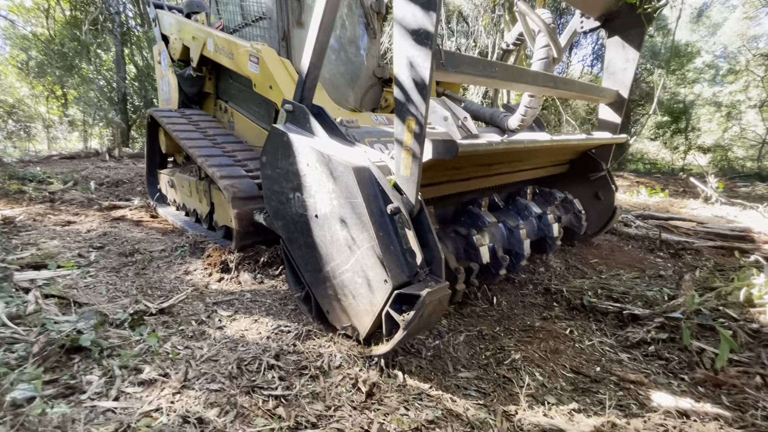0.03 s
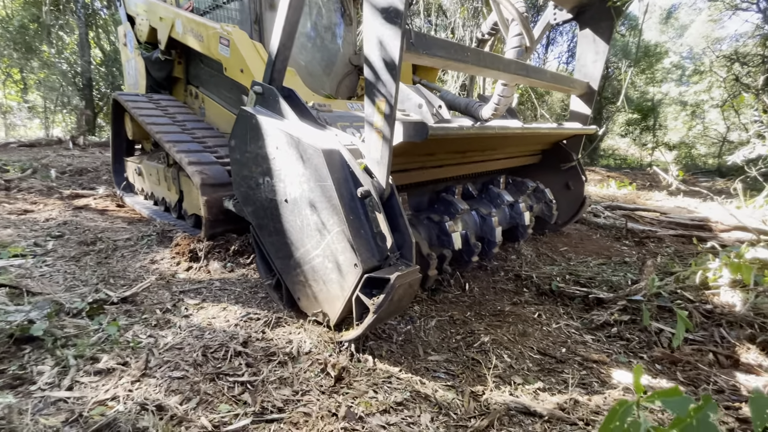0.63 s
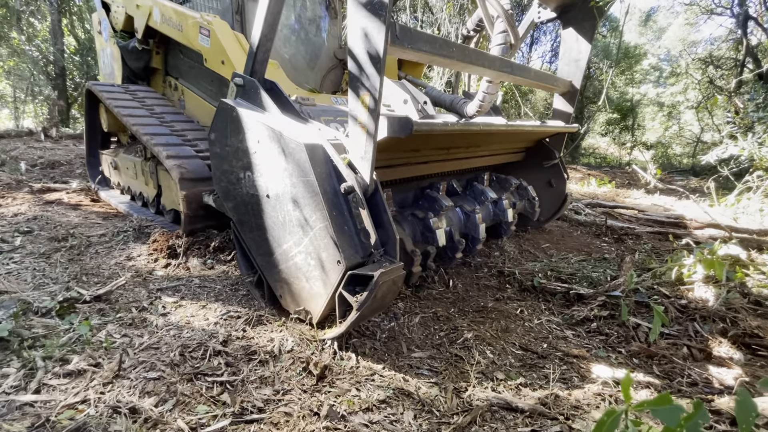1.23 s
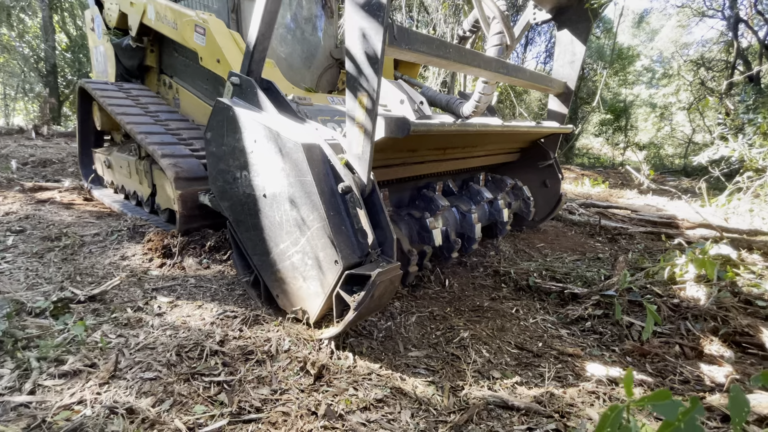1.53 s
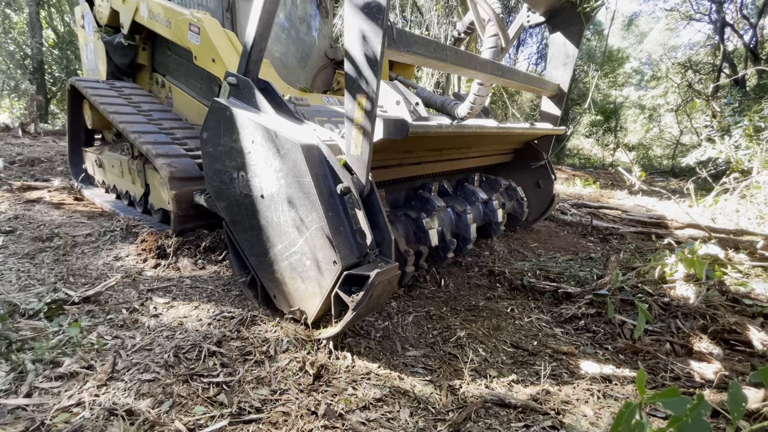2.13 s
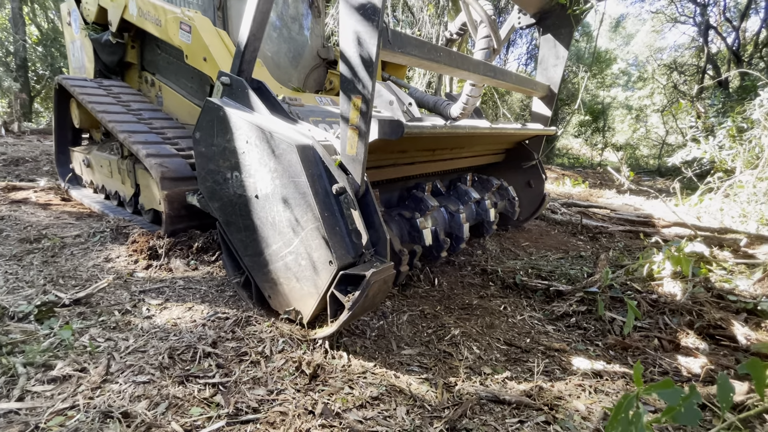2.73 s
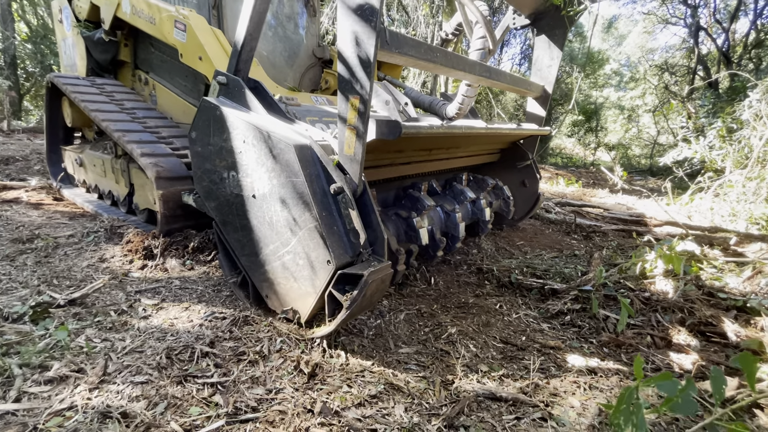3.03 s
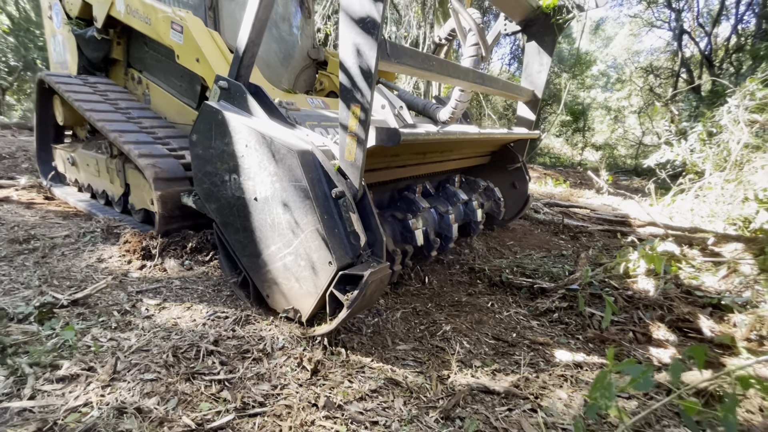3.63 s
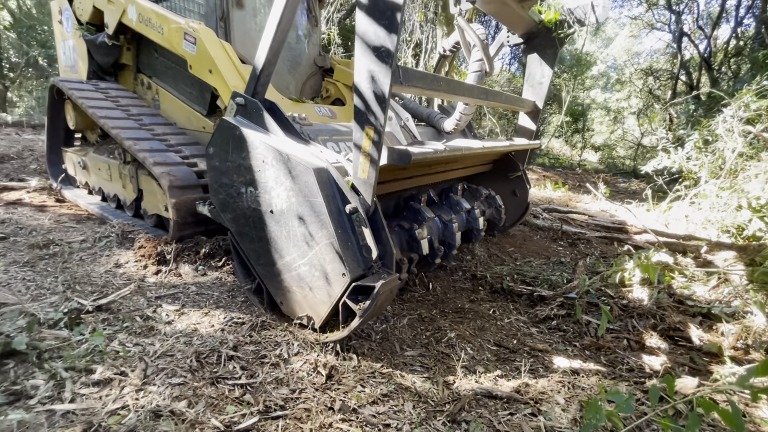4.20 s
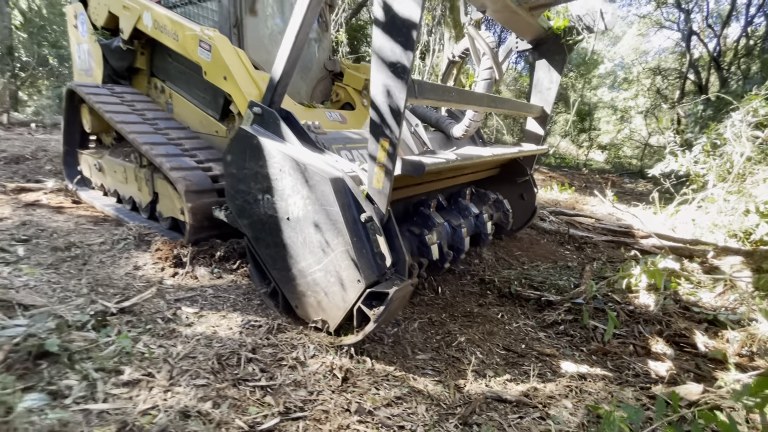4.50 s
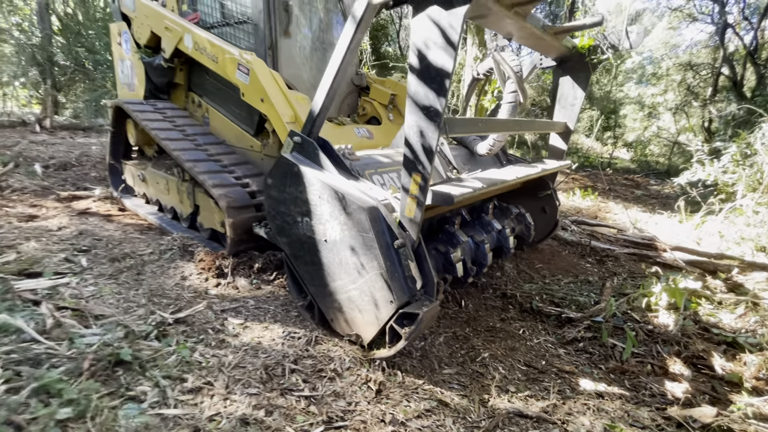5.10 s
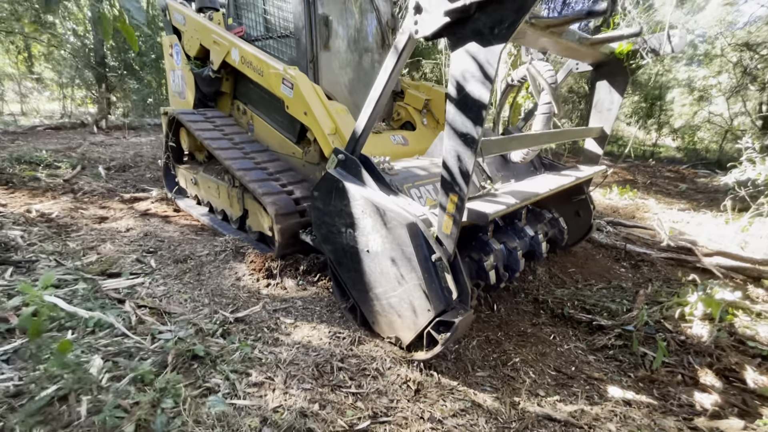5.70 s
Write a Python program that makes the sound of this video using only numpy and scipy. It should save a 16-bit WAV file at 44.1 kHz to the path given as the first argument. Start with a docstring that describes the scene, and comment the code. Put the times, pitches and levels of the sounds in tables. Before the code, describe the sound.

A diesel loader stands at high idle, droning, knocking and whining, with light twig snaps and dry leaf rustle underfoot.

```python
"""In a wood, a few metres from a hand-held phone, a tracked loader with a mulching head stands at high
idle: its four-cylinder diesel drones and knocks and its hydraulics whine throughout. In the first
half second an engine further off throttles back, leaving a low hum. Dry leaves rustle underfoot,
then twigs crack and air puffs on the microphone. Past three seconds loose panels rattle, and
towards the end the listener steps aside through the lobes and shadows of the machine's sound."""
import sys
import numpy as np
from scipy import signal
from scipy.fft import rfft, irfft
from scipy.io import wavfile
from scipy.ndimage import uniform_filter1d, map_coordinates

SR = 44100
rng = np.random.default_rng(int(sys.argv[2]) if len(sys.argv) > 2 else 0)


def dump(signal):
    """Clip the signal to [-1, 1] and save it as 16-bit WAV at the path in sys.argv[1]."""
    limited = np.clip(np.atleast_2d(signal).T, -1, 1)
    pcm = np.round(limited * 32767).astype(np.int16)
    wavfile.write(sys.argv[1], SR, pcm)


N = 262395
TIME = np.arange(N) / SR
FREQ = np.maximum(np.arange(N // 2 + 1) * SR / N, 1)

# the loader's four-stroke cycle rate: t/s, f/Hz
CYCLE_RATE = [(0, 18.86), (.17, 18.76), (.3, 18.85), (.6, 18.92), (5.95, 18.92)]
# exhaust, fan and block tones: multiple of the cycle rate, level/dB
DRONE_TONES = [(4, -30), (6, -41.5), (7, -40.5), (8, -50), (9, -63), (10, -54.5), (11, -54), (12, -49),
               (13, -58), (14, -49.5), (15, -61), (16, -51), (17, -67), (18, -60), (19, -56), (20, -42.5),
               (21, -52), (22, -60), (23, -63), (24, -43), (25, -61), (26, -56), (27, -51.5), (28, -49),
               (29, -49.5), (30, -53), (31, -60), (32, -49), (33, -60), (34, -53), (35, -48), (36, -44.5),
               (37, -55), (38, -51), (39, -59), (40, -55.5), (42, -57), (43, -57)]
# pump and gear tones: multiple of the cycle rate, relative level/dB
WHINE_TONES = [(46, -63), (47, -61), (48, -52.5), (50, -62), (51, -63), (52, -58), (54, -53), (60, -65),
               (64, -62), (68, -63), (70, -65), (72, -56.5), (74, -61), (76, -61), (77, -64), (84, -61),
               (96, -61.5), (104, -61), (108, -62), (120, -69), (125, -60.5), (133, -66), (134, -64),
               (139, -67), (142, -66), (144, -57.5), (153, -67), (155, -68), (156, -68), (162, -69),
               (168, -73), (176, -68), (192, -73), (212, -75), (288, -72), (312, -75), (336, -73)]
# the phone's two microphone ports: f/Hz, lead of left over right/rad, likeness 0-1
MIC_PORTS = [(70, .8, .85), (150, 1.5, .7), (230, 0, .85), (400, -.15, .85), (520, .25, .8), (700, 1, .65),
             (830, 1.6, .45), (905, 2.5, .6), (965, 1.6, .7), (1020, 1.45, .8), (1300, 3, .65),
             (1450, 2.8, .65), (1750, 1.7, .65), (2300, 3.7, .75), (2900, 4, .65), (3400, 6.7, .5),
             (4200, 6.5, .5), (4700, 9, .4), (5700, 12, .4), (6800, 13, .4), (9000, 16.5, .4),
             (10500, 21.3, .85), (12000, 18.9, .9)]


def loader():
    """A few metres off: the diesel and its pumps, all geared to one governed shaft."""
    cycle = np.cumsum(curve(CYCLE_RATE) * (1 + 0.000495 * walk(15))) / SR
    cycle = cycle + .0004 * walk(45)  # the shaft twists a little, which blurs the highest whines
    drone = tones(cycle, DRONE_TONES, flutter_db=.8, sway_db=.6)
    whine = undb(1.5) * tones(cycle, WHINE_TONES, flutter_db=1.1, sway_db=.9)
    machine = drone + whine + clatter(cycle) + diesel_knock(cycle) + roar(cycle)
    return at_ports(step_aside(machine) + rattles(cycle))


def tones(cycle, partials, flutter_db, sway_db):
    """Tones locked to the crankshaft; some low ones join in a thump, higher ones come by any path."""
    # the side each tone is heard on: f/Hz, left minus right/dB
    sides = [(76, 4), (130, 18), (220, 18.5), (390, 7), (470, 16.5), (700, 8.5), (900, 6.5), (1020, 16.5),
             (1300, 9), (1550, 30), (1900, -7.5), (3000, -8.5), (6400, 7)]
    # standing waves around the machine: multiple of the cycle rate, crossing t/s, half-length/s, gain/dB
    standing_waves = [(12, 5.8, .6, -5), (24, 5.7, .7, 3), (27, 5.4, 1.2, 4), (28, 5.8, .8, -10),
                      (29, 5.5, 1.2, 3), (32, 5.8, .6, 3), (36, 5.8, .6, -5), (54, 5.6, 1.5, 4.5),
                      (64, 5, 1, -14), (68, 4.6, .9, 6), (84, 4.8, .7, -12), (108, 3.7, .6, -8),
                      (108, 5.3, .6, 3), (120, 4.6, 1, 9), (125, 4.6, 1.5, -10), (144, 5.2, .6, -7),
                      (168, 4.3, .8, 6)]
    thump_multiples, thump_place = range(10, 19), .62  # the block thumps here and half a cycle later
    out = np.zeros((2, N))
    for multiple, db in partials:
        pan_db = np.interp(multiple * CYCLE_RATE[-1][1], *np.transpose(sides))
        lobe_db = sum(peak * swell(s, half_s) for k, s, half_s, peak in standing_waves if k == multiple)
        gain = undb(db + lobe_db + flutter_db * walk(21.75) + sway_db * walk(2.624))
        phase = rng.random() * (multiple > 4)
        if multiple in thump_multiples:
            # odd multiples lie a quarter turn off, so both thumps of a cycle are equally strong
            phase = -multiple * thump_place + multiple % 2 / 4
        out += pan(pan_db) * gain * np.sqrt(2) * np.cos(2 * np.pi * (multiple * cycle + phase))
    return out


def roar(cycle):
    """Combustion noise throbs with the four firings of a cycle under a smooth hiss of fan air."""
    # fan air and combustion spectrum: f/Hz, left level/dB, right level/dB
    colour = [(20, -95, -95), (47, -65, -64), (66, -64, -60), (100, -70, -67), (165, -70.5, -80),
              (290, -74.5, -84), (420, -72, -79), (520, -68.5, -78), (620, -70.5, -79), (780, -77.5, -81),
              (1000, -78, -85), (1200, -81, -86), (1560, -78.5, -81), (1950, -85, -82),
              (2650, -83.5, -80.5), (3300, -87, -84), (4400, -86.5, -85), (5400, -85.5, -88),
              (7000, -88, -97), (8500, -87, -95.5), (10000, -97, -99), (11500, -97, -97.5)]
    decay_firings, throb_top_hz = .85, 1500
    air = rng.standard_normal((2, N)) * undb(.5 * walk(13))
    pulsing = unit(1 + np.exp(-(4 * cycle % 1) / decay_firings))
    throb = shape(air * (pulsing - 1), 1 / (1 + (FREQ / throb_top_hz) ** 2))
    return undb(-0.43) * radiate(air + throb, colour)


def clatter(cycle):
    """Injectors and valves strike alike on every cycle: a comb of weak lines between the main tones."""
    # injector and valve spectrum: f/Hz, left level/dB, right level/dB
    colour = [(168, -75, -99), (477, -59, -78), (655, -75, -93), (855, -74.5, -80.5), (1310, -73.5, -73),
              (1600, -78.5, -82.5), (2130, -75, -74), (2930, -80, -81.5), (3250, -104.5, -90),
              (4700, -87, -82.5), (6850, -104, -106)]
    size, injection_place = 2304, .07  # samples a cycle; injectors strike here and half a cycle later
    since_strike = 2 * (np.arange(size) / size - injection_place) % 1
    strikes = rng.standard_normal((2, size)) * np.exp(-since_strike / 1.2)
    lines = np.exp(1j * np.angle(rfft(strikes)))
    main_multiples = [int(multiple) for multiple, _ in [*DRONE_TONES, *WHINE_TONES]]
    lines[:, [0] + main_multiples] = 0
    patterns = unit(irfft(lines * undb(2 * rng.standard_normal(size // 2 + 1))))
    repeats = [map_coordinates(p, [cycle % 1 * size], order=3, mode="grid-wrap") for p in patterns]
    return undb(-3.0) * radiate(repeats, colour)


def diesel_knock(cycle):
    """Two cylinders fire harder than the rest: each rings the block and ticks once a cycle."""
    # the hard-firing cylinders: place in the cycle 0-1, relative level/dB
    cylinders = [(.25, -5), (.73, 0)]
    ring_hz, decay_s = 1630, .004
    blow, ring = 0, 0
    for place, db in cylinders:
        age = ((cycle - place) % 1) / CYCLE_RATE[-1][1]
        stroke = undb(db) * np.exp(-age / decay_s)
        blow += stroke
        ring += stroke * np.sin(2 * np.pi * ring_hz * age)
    rasp = unit(resonance(blow * rng.standard_normal(N), ring_hz, width_hz=750))
    block = unit(unit(ring) + .8 * rasp)
    tick = unit(resonance(blow * rng.standard_normal((2, N)), hz=5300, width_hz=3800))
    return pan(1.6) * (undb(-51.5) * block + undb(-73.5) * tick)


def rattles(cycle):
    """Each cycle shakes the loose panels into a short metallic rasp, each heard from its own spot."""
    # panel resonances: f/Hz, width/Hz, loudest t/s, half-length/s, level/dB
    panels = [(2687, 150, 3.67, .75, -50), (2930, 140, 4.25, 0.43, -51.5), (2860, 190, 4.8, .3, -52)]
    shake_place, decay_cycles = .55, .6
    shake = np.exp(-((cycle - shake_place) % 1) / decay_cycles) * rng.standard_normal(N)
    return pan(-5.0) * sum(undb(db) * swell(s, half_s) * unit(resonance(shake, hz, width_hz))
                           for hz, width_hz, s, half_s, db in panels)


def step_aside(x):
    """Each lobe or shadow lifts or lowers its band while the microphone is carried through it."""
    # lobes (+) and shadows (-) of the panels: f/Hz, half-width/Hz, crossing t/s, half-length/s, gain/dB
    lobes = [(76, 67, 6.4, 1.7, -4), (168, 55, 8.2, 0.84, 6), (250, 60, 5, 1.1, -3.5),
             (390, 200, 5.9, 2.6, 2.5), (692, 110, 4.86, 1.07, -3.5), (910, 17, 6, 0.43, -11),
             (876, 75, 4.57, 1.6, 4.5), (996, 60, 4.2, 1.3, 5), (1250, 94, 4.93, 0.88, 6),
             (1700, 360, 5.7, 0.46, -1), (1500, 950, 6.15, 1.4, 3), (2110, 130, 6.06, 0.52, 5.5),
             (2320, 120, 4.4, 0.2, 3), (2880, 54, 4.2, .7, -9), (3160, 100, 4.16, .55, 3)]
    for hz, width_hz, s, half_s, db in lobes:
        band = shape(x, np.exp(-((FREQ - hz) / width_hz) ** 2))
        x = x + band * (undb(db * swell(s, half_s)) - 1)
    return x


def radiate(pair, colour):
    """Colour two unrelated white signals into sound that is partly alike at the two microphone ports."""
    alike = np.clip(spectra(MIC_PORTS)[1], 0, 1)
    right = shape(pair[0], alike) + shape(pair[1], np.sqrt(1 - alike ** 2))
    return shape(np.array([pair[0], right]), undb(spectra(colour)) * np.sqrt(SR / 2))


def at_ports(x):
    """Sound from the machine reaches the right microphone port later than the left."""
    lead = spectra(MIC_PORTS)[0]
    return np.array([x[0], shape(x[1], np.exp(-1j * lead))])


def far_engine():
    """Further off, uneven exhaust pulses slow and fade; the boom comes straight, the rasp off trunks."""
    # muffler response: f/Hz, left gain/dB, right gain/dB
    muffler = [(40.6, -30, -64), (77.7, -6, 17.5), (114, -11, 2), (147.3, 11, 0), (194, -17, -30),
               (298, 2, -7), (377, -6.5, -13), (453, -2.5, -8), (525, -7, -15), (593, 1, -5),
               (670, -6, -13), (830, -33, -14.5), (1360, -14.5, -24.5), (2080, -33, -25.5),
               (3860, -34, -37), (8850, -41, -57)]
    load_hz, idle_hz, release_s, sink_s = 74.5, 30, .33, .6  # firings sink once the throttle is let go
    fade_from_s, fade_db_per_s = .44, 18
    boom_ends_s, boom_fall_s = .4, .01
    scatter_hz, echo_decay_s = 450, .04
    coasting = np.maximum(TIME - release_s, 0)
    firing_hz = idle_hz + (load_hz - idle_hz) * np.exp(-coasting / sink_s)
    firings = np.cumsum(firing_hz * (1 + .005 * walk(60))) / SR
    pulses = np.diff(np.floor(firings), prepend=0) * undb(0.62 * walk(120))
    gas = unit(np.exp(-(firings % 1) / .5) * rng.standard_normal(N))
    level = undb(-34.5 - fade_db_per_s * np.maximum(TIME - fade_from_s, 0))
    exhaust = level * unit(shape(unit(pulses - pulses.mean()) + 1.2 * gas, undb(spectra(muffler))))
    trunks = rng.standard_normal((2, SR // 2)) * np.exp(-TIME[:SR // 2] / echo_decay_s)
    echo = signal.fftconvolve(exhaust, trunks / np.sqrt(np.sum(trunks[0] ** 2)), axes=1)[:, :N]
    on_load = .5 - .5 * np.tanh((TIME - boom_ends_s) / boom_fall_s / 2)
    return exhaust * on_load + undb(6.5) * shape(echo, FREQ ** 2 / (FREQ ** 2 + scatter_hz ** 2))


def hums():
    """Off to the left, wavering hums beat against the drone, probably the second engine idling."""
    # tones not geared to the loader: f/Hz, level/dB
    free_tones = [(64.3, -54), (90, -56), (96.3, -55), (116.2, -49), (128.9, -48.5), (193, -61), (208, -61),
                  (257.3, -57), (525, -53)]
    hum = 0
    for hz, db in free_tones:
        level = undb(db + 2 * walk(3))
        turns = np.cumsum(hz * (1 + .004 * walk(4))) / SR
        hum += level * np.cos(2 * np.pi * turns)
    return pan(10) * np.sqrt(2) * hum


def twigs():
    """Underfoot, fibres tear in a burst: each twig rings briefly in two bands under bright splinters."""
    # breaking twigs: t/s, level/dB, ring f/Hz, decay/s, crack f/Hz, crack over ring/dB
    breaks = [(.933, -35, 4700, .003, 7500, -7), (.993, -29.5, 4760, 0.0049, 7200, -9),
              (1.487, -36.5, 8000, 0.0035, 5500, -1), (1.625, -26.5, 8000, 0.0021, 6900, -14),
              (1.7242, -25, 7600, 0.0017, 4450, 1), (1.901, -35, 8200, 0.002, 5500, -1),
              (2.023, -36, 7850, .004, 4970, -1), (2.698, -36.5, 8100, .0025, 5500, -5),
              (3.413, -38.5, 7460, 0.0087, 4960, 2), (3.429, -41, 5450, .005, 3800, 1),
              (3.44, -28.5, 8250, 0.0023, 5040, -8), (3.566, -38, 6460, .004, 8450, -4),
              (3.608, -38, 8540, .005, 5500, 0)]
    size, attack_s = 4096, .00034
    age = TIME[:size]
    out = np.zeros((2, N))
    for s, db, hz, decay_s, crack_hz, crack_db in breaks:
        burst = rng.standard_normal((2, size)) * np.exp(-age / decay_s) * (1 - np.exp(-age / attack_s))
        ring = pan(6) * snap(burst, hz, width_hz=2400)
        crack = undb(crack_db) * snap(burst, crack_hz, width_hz=1100)
        splinter = undb(-6) * snap(burst, hz=11500, width_hz=5900)
        start = int(s * SR)
        out[:, start:start + size] += undb(db) * (ring + crack + splinter)[:, :N - start]
    return out


def snap(burst, hz, width_hz):
    """A short burst rung through one steep resonance, peak 1."""
    twig = signal.iirpeak(min(hz, SR / 3), hz / width_hz, fs=SR)
    ring = signal.lfilter(*twig, signal.lfilter(*twig, burst))
    return ring / np.abs(ring).max()


def leaves():
    """Below the microphone, tiny crackles swell under each step, each patch of litter its own colour."""
    # dry leaf spectrum: f/Hz, relative level/dB
    colour = [(1500, -25), (3500, 10), (6000, 6), (9000, 9), (12000, -27)]
    # feet shifting in the litter: t/s, level/dB, half-length/s, centre f/Hz, left minus right/dB
    footsteps = [(.08, -56.5, 0.29, 3800, -5), (.45, -56.5, 0.13, 6000, 10), (0.447, -57, 0.16, 11600, -2),
                 (.8, -65, 0.19, 5650, 0), (3.436, -65, .03, 7600, 7), (3.432, -54, .03, 4260, 0),
                 (4.95, -63, 0.15, 3700, -3), (5.3, -60.5, 0.93, 5900, 3), (5.553, -59, 0.073, 3600, -7),
                 (5.88, -59, 0.11, 4400, -1)]
    crackles_per_s = 2500
    onsets = rng.random((2, N)) < crackles_per_s / SR
    grains = onsets * rng.standard_normal((2, N)) * undb(1.8 * rng.exponential(size=(2, N)))
    broad = undb(-1.5) * unit(shape(grains, undb(spectra(colour))))
    rustle = 0
    for s, db, half_s, hz, pan_db in footsteps:
        patch = unit(resonance(grains, hz, width_hz=1500))
        rustle += pan(pan_db) * undb(db) * swell(s, half_s) * (patch + broad)
    return rustle * undb(2.0 * walk(15))


def breeze():
    """Soft low thumps where moving air meets the right microphone port, over a faint uneven draught."""
    # puffs of air on the microphone: t/s, level/dB
    puffs = [(1.151, -46), (2.3, -46), (3.082, -42.5), (4.14, -41), (4.68, -52), (4.9, -46), (5.8, -46)]
    thump_hz, width_hz = 56, 16
    gusts = sum(undb(db) * swell(s, half_s=.19) for s, db in puffs)
    draught = undb(-81 + 2 * walk(5.9))
    rumble = unit(shape(rng.standard_normal(N), np.exp(-((FREQ - thump_hz) / width_hz) ** 2)))
    return pan(-31) * (gusts + draught) * rumble


def undb(db):
    """Decibels to gain."""
    return 10 ** (np.asarray(db) / 20)


def unit(x):
    """Scale to rms 1."""
    return x / np.sqrt(np.mean(x ** 2))


def curve(rows):
    """Join (t/s, value) rows by straight lines."""
    return np.interp(TIME, *np.transpose(rows))


def spectra(rows):
    """Join each column of (f/Hz, ..) rows on a log-frequency axis."""
    hz, *columns = np.transpose(rows)
    return np.array([np.interp(np.log(FREQ), np.log(hz), c) for c in columns])


def shape(x, gain):
    """Filter by a gain for each frequency."""
    return irfft(rfft(x) * gain, N)


def resonance(x, hz, width_hz):
    """One resonance with steep skirts."""
    return shape(x, 1 / (1 + 2j * (FREQ - hz) / width_hz) ** 2)


def pan(db):
    """Left and right gains of constant total power, the left louder by db."""
    return unit(undb(np.array([[db], [-db]]) / 2))


def walk(rate):
    """Random levels held 1 / rate s and slewed twice; spread near 1."""
    hold = max(int(SR / rate), 1)
    levels = np.repeat(rng.standard_normal(N // hold + 1), hold)
    return 1.22 * uniform_filter1d(uniform_filter1d(levels, hold), hold)[:N]


def swell(s, half_s):
    """A smooth rise and fall around a moment, 1 at the top."""
    return np.exp(-((TIME - s) / half_s) ** 2)


def scene():
    """The loader in front, another engine deeper in the wood, small sounds at the listener's feet."""
    return loader() + far_engine() + hums() + twigs() + leaves() + breeze()


def record(dry):
    """The phone cuts the top treble off steeply."""
    top_hz = 11700
    return signal.sosfilt(signal.ellip(10, .2, 80, top_hz, fs=SR, output="sos"), dry)


dry = scene()
out = record(dry)
dump(out)
```